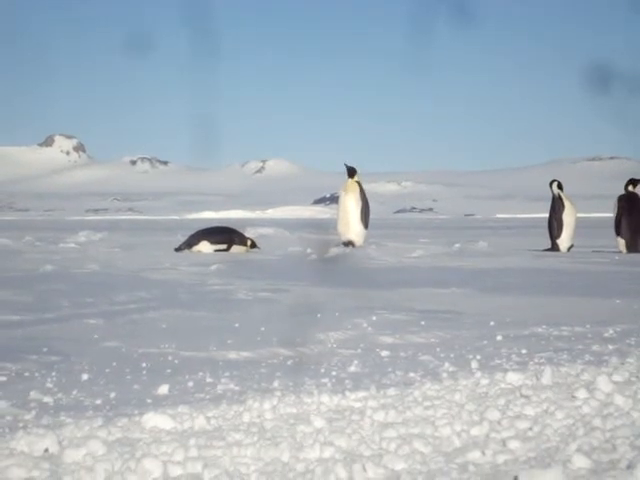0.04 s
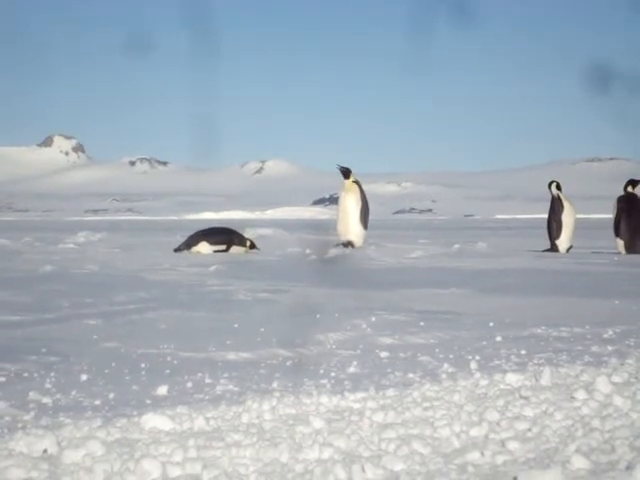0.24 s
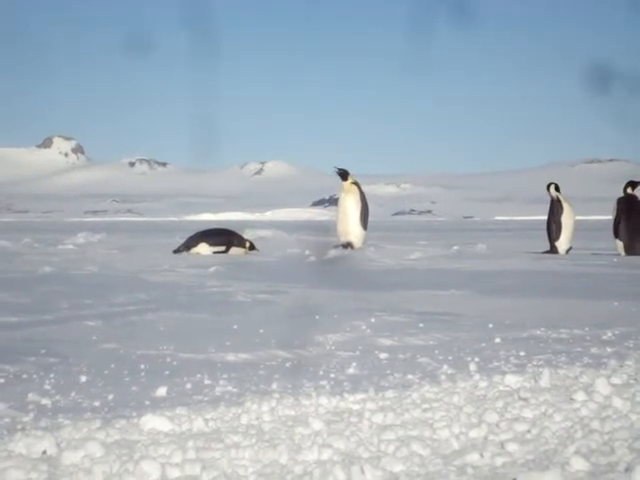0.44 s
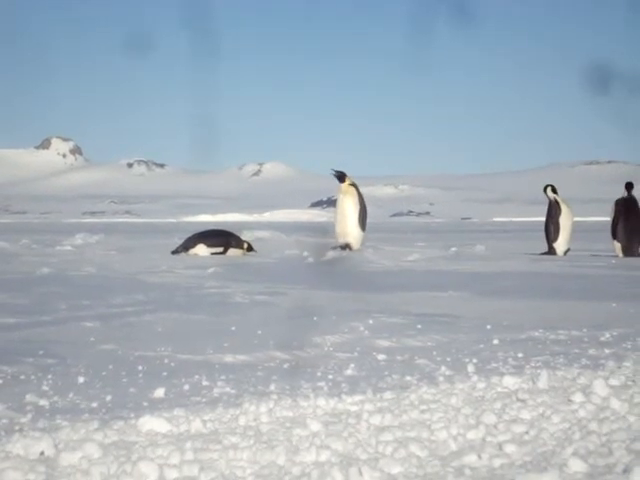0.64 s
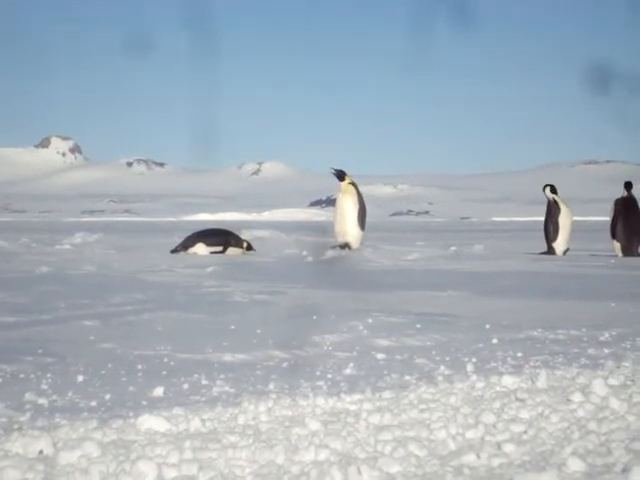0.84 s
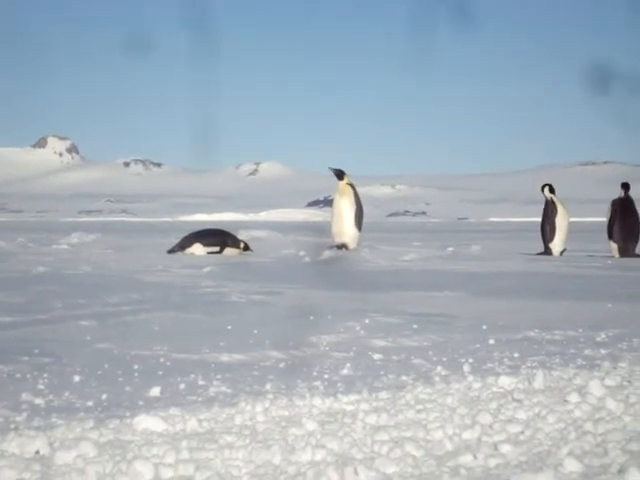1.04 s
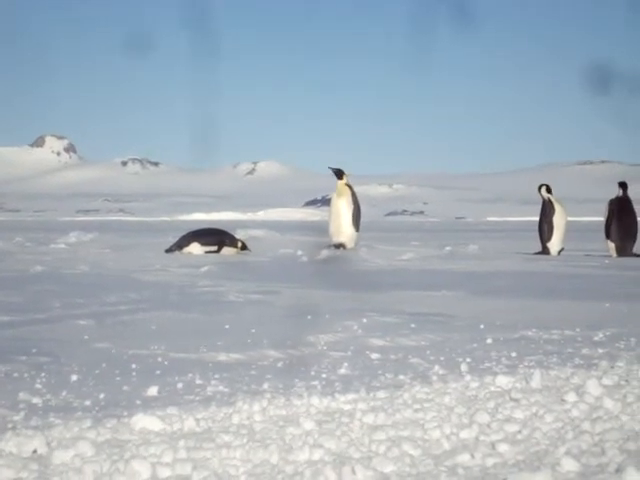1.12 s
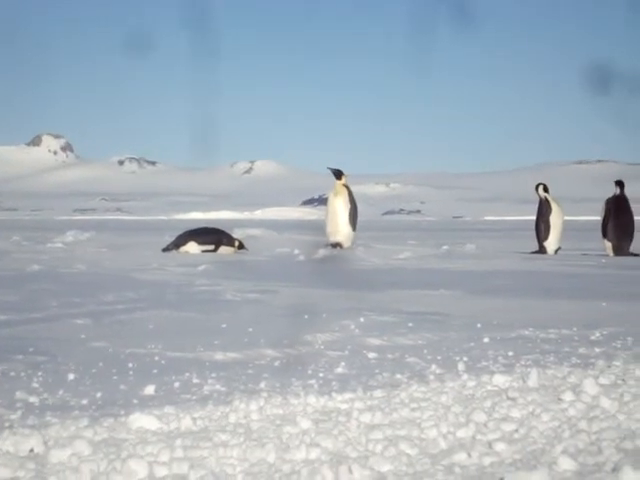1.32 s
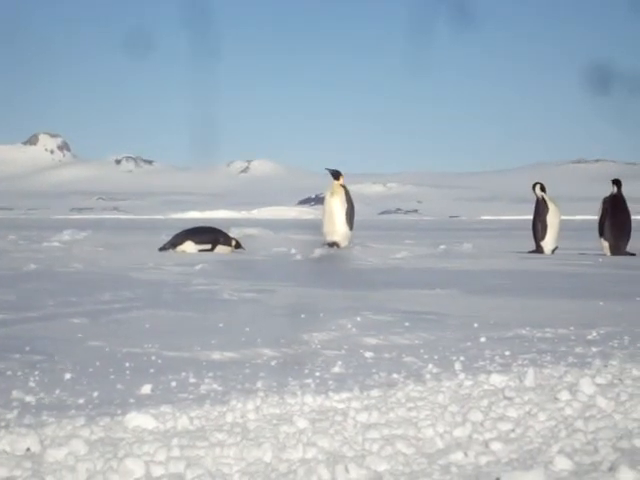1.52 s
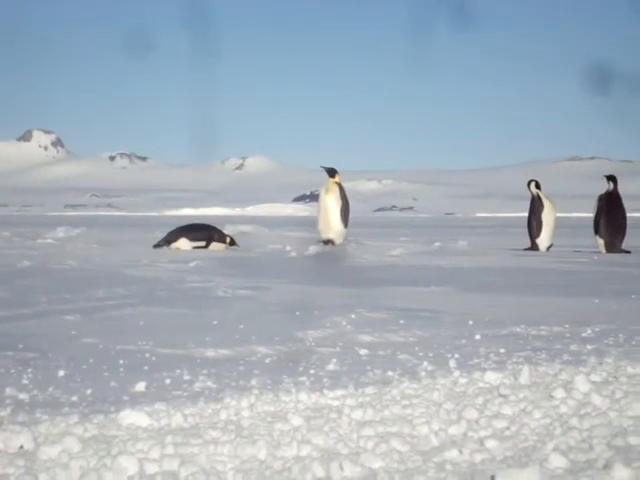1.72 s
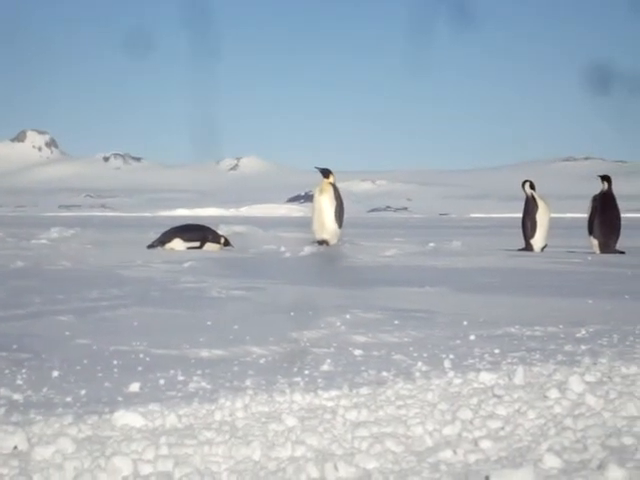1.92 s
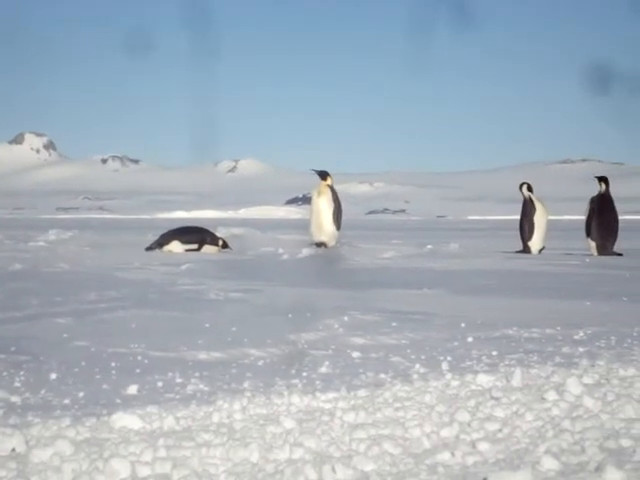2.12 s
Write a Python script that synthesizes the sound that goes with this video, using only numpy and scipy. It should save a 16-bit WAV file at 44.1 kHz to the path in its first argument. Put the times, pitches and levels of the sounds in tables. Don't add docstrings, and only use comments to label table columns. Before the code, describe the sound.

Single loud raspy penguin call, rising then sagging into small creaks, with faint steady wind hiss.

```python
import sys
import numpy as np
from scipy import signal
from scipy.fft import rfft, irfft, next_fast_len
from scipy.io import wavfile
from scipy.ndimage import uniform_filter1d, map_coordinates

SR = 44100
rng = np.random.default_rng(int(sys.argv[2]) if len(sys.argv) > 2 else 0)


def makeup_ratio(level_db):
    decades = np.asarray(level_db, float) / 20
    return 10 ** decades


def pcm_store(signal):
    levels = np.round(np.clip(np.atleast_2d(signal), -1, 1) * 32767)
    wavfile.write(sys.argv[1], SR, levels.astype(np.int16).T)


N = 94815

# t/s, level/dB, pulse sharpness/(0-1), chest hum level/dB
EFFORT = [(.135, -59, 0.67, -62), (.168, -41.5, 0.82, -54.5), (.23, -33.5, 0.83, -56),
          (.36, -24.5, 0.87, -44.5), (.65, -21.5, 0.8, -41), (.95, -22, 0.83, -48.5),
          (1.1, -31.5, 0.89, -60), (1.16, -40.5, 0.76, -57), (1.22, -56, 1, -69)]
# t/s, opening/(0-1)
BILL = [(.14, 0), (.27, .1), (.4, .8), (.5, 1), (.9, 1), (1.05, .4), (1.12, 0)]


def bleat():
    hum_shake, hum_lower_db = .18, -13
    flutter_db, flutter_rate = 2.5, 44.99
    level_db, sharp, hum_db = curves(EFFORT)
    bill = curves(BILL)[0]
    upper, lower = membrane_phases()
    flow = syrinx_flow(upper, lower, np.clip(sharp, .3, .93))

    voice = vocal_tract(flow, bill)
    power = uniform_filter1d(uniform_filter1d(voice ** 2, size=1500), size=1500)
    voice = voice / np.sqrt(np.abs(power) + 1e-12)
    flutter = flutter_db * wobble(flutter_rate) * (1 - bill)

    hum = np.sin(upper) * (1 + hum_shake * np.cos(upper - lower))
    hum = makeup_ratio(hum_db) * (hum + makeup_ratio(hum_lower_db) * np.sin(lower))
    t = np.arange(N) / SR
    onset = np.clip((t - EFFORT[0][0]) / 0.0025, 0, 1)
    release = np.clip((EFFORT[-1][0] - t) / 0.0088, 0, 1)
    return onset * release * (hum + voice * makeup_ratio(level_db + flutter))


# t/s, f/Hz
PITCH = [(.14, 340), (.2, 420), (.29, 482), (.41, 528), (.59, 549), (.8, 536.6), (.95, 505.6), (1.07, 427),
         (1.23, 272)]
# t/s, frequency ratio/1
RATIO = [(.14, 1.12), (.19, 1.2), (.63, 1.2), (.77, 1.225), (.9, 1.242), (.95, 1.235), (1.02, 1.2),
         (1.05, 1.2), (1.12, 1.25)]


def membrane_phases():
    lower_start, jitter = 0.23, .015
    hz = arch(PITCH)
    upper = 2 * np.pi * np.cumsum(hz) / SR + jitter * wobble(250)
    lower = 2 * np.pi * np.cumsum(hz / curves(RATIO)[0]) / SR + lower_start + jitter * wobble(250)
    return upper, lower


# t/s, level/dB
BREATH = [(.14, -3), (.25, -10), (.4, -18), (.63, -20), (.68, -15), (.95, -14), (1.12, -5)]


def syrinx_flow(upper, lower, sharp):
    lower_db, shimmer_db = -2.5, .4
    shake_upper, shake_lower = 0.035, 0.37
    pull_upper, pull_lower = 0.23, 0.14
    beat = upper - lower
    a = pulses(upper - pull_upper * np.cos(beat), sharp) * makeup_ratio(shimmer_db * wobble(150))
    b = pulses(lower - pull_lower * np.cos(beat), sharp) * makeup_ratio(shimmer_db * wobble(240))
    a = a * (1 - shake_upper * np.sin(beat))
    b = b * (1 + shake_lower * np.sin(beat))
    flow = unit(a + makeup_ratio(lower_db) * b)
    hiss = unit((1 + np.abs(flow)) * rng.standard_normal(N))
    return flow + makeup_ratio(curves(BREATH)[0]) * hiss


def pulses(phase, sharp):
    series = (1 - sharp ** 2) / (1 - 2 * sharp * np.cos(phase) + sharp ** 2)
    return series - 1 - 2 * sharp * np.cos(phase)


# f/Hz, width/Hz, level/dB
OPEN = [(1102, 240, 5), (1442, 280, 5.5), (1770, 200, -21), (2340, 57, -31), (2547, 370, 16),
        (3100, 200, 12), (3720, 730, 18.5), (4330, 550, 11), (5070, 200, -25)]
SHUT = [(725, 380, -7.5), (1370, 460, -12.5), (1780, 120, -16.5), (2261, 120, 10.5), (2500, 360, -1.5),
        (3576, 410, 4.5), (4300, 170, -6.5)]
# f/Hz, width/Hz, level/dB
HEAD = [(6700, 400, -24.5), (9130, 610, 1.5), (9420, 83, -9)]
HEAD_SHUT = [(6400, 250, -1.5), (7900, 500, -9.5), (9000, 500, -29.5)]
# f/Hz, width/Hz, level/dB
SLACK = [(790, 130, -15.5), (1330, 250, -4), (2100, 250, -9), (2450, 200, 5), (3100, 230, -1.5),
         (3860, 450, -1.5), (4570, 400, -19.5)]


def vocal_tract(flow, bill):
    slack_from_s, slackening_s = .5, .4
    late = np.clip((np.arange(N) / SR - slack_from_s) / slackening_s, 0, 1)
    closed = (1 - late) * unit(throat(flow, SHUT, HEAD_SHUT)) + late * unit(throat(flow, SLACK, []))
    return bill * unit(throat(flow, OPEN, HEAD)) + (1 - bill) * closed


def throat(x, resonances, head):
    low_cut_hz, high_cut_hz = 573, 4950

    def edge(u):
        return 1 / (1 - u * u + 1.3j * u) ** 2

    def response(f):
        body = rings(f, resonances) * edge(f / high_cut_hz) * edge(-low_cut_hz / (f + 1))
        return body + rings(f, head) * edge(-high_cut_hz / (f + 1))

    return filtered(x, response)


def rings(f, resonances):
    return sum(makeup_ratio(db) * 1j * f * w / (c * c - f * f + 1j * f * w) for c, w, db in resonances)


# t/s, peak level/dB
CREAKS = [
    (1.168, -38),
    (1.178, -37),
    (1.19, -42),
    (1.2, -37),
    (1.215, -39),
    (1.224, -44),
    (1.233, -42),
    (1.245, -44),
]


def creaks():
    t60_s = .05
    x, t = np.zeros(N), np.arange(SR // 20) / SR
    noise = rng.standard_normal((len(CREAKS), len(t)))
    click = 3 * (t < 2 / SR)
    for (s, db), puff in zip(CREAKS, noise):
        decaying = .5 * puff * makeup_ratio(-60 * t / t60_s)
        x[round(s * SR):][:len(t)] += makeup_ratio(db) * (decaying + click)
    return throat(x, SLACK, [])


def ground_bounce(x):
    bounce_db, delay_s = -22, 0.001103
    return filtered(x, lambda f: 1 + makeup_ratio(bounce_db) * np.exp(-2j * np.pi * f * delay_s))


def ice(x):
    level_db, t60_s, delay_s = -21, .22, .004
    t = np.arange(SR // 2) / SR
    tail = rng.standard_normal(len(t)) * makeup_ratio(-60 * t / t60_s) * (t > delay_s)
    return makeup_ratio(level_db) * signal.fftconvolve(x, tail / np.linalg.norm(tail))[:N]


# f/Hz, level/dB
AIR = [(15, -72.5), (25, -26), (118, -8.5), (141, -6.5), (322, -5.5), (365, -4), (470, -4.5), (651, -4.5),
       (10000, -12.5), (13000, -79.5), (22000, -120)]


def air():
    level_db, swell_db, patchy_db = -60, .2, .6
    z = signal.stft(rng.standard_normal(N), nperseg=512)[2]
    field = uniform_filter1d(rng.standard_normal(z.shape), size=6, axis=0)
    field = uniform_filter1d(field, size=14, axis=1)
    x = signal.istft(z * makeup_ratio(patchy_db * unit(field)), nperseg=512)[1][:N]
    f, db = np.transpose(AIR)
    x = filtered(x, lambda hz: makeup_ratio(np.interp(np.log(hz + 1), np.log(f + 1), db)))
    return makeup_ratio(level_db + swell_db * wobble(1.84)) * unit(x)


def unit(x):
    return x / np.sqrt(np.mean(x ** 2) + 1e-20)


def curves(rows):
    s, *cols = np.transpose(rows)
    return [np.interp(np.arange(N) / SR, s, c) for c in cols]


def arch(rows):
    s, v = np.transpose(rows)
    t = np.clip(np.arange(N) / SR, s[0], s[-1])
    k = np.clip(np.searchsorted(s, t) - 1, 0, len(s) - 2)
    h, rise, slope = np.diff(s)[k], np.diff(v)[k], np.gradient(v, s)
    u = (t - s[k]) / h
    bend = (1 - u) * (slope[k] * h - rise) - u * (slope[k + 1] * h - rise)
    return v[k] + u * rise + u * (1 - u) * bend


def wobble(rate):
    return map_coordinates(rng.standard_normal(int(N * rate / SR) + 4), [np.arange(N) * rate / SR])


def filtered(x, response):
    m = next_fast_len(N + SR // 2)
    return irfft(rfft(x, m) * response(np.fft.rfftfreq(m, 1 / SR)), m)[..., :N]


def scene():
    bird = ground_bounce(bleat() + creaks())
    return (bird + ice(bird) + air())[None]


def low_pass(x):
    return signal.sosfilt(signal.butter(12, 10150, fs=SR, output="sos"), x)


def record(dry):
    top_hz = 10164
    mix = filtered(dry, lambda hz: hz < top_hz)
    return low_pass(mix)


dry = scene()
out = record(dry)
pcm_store(out)
```